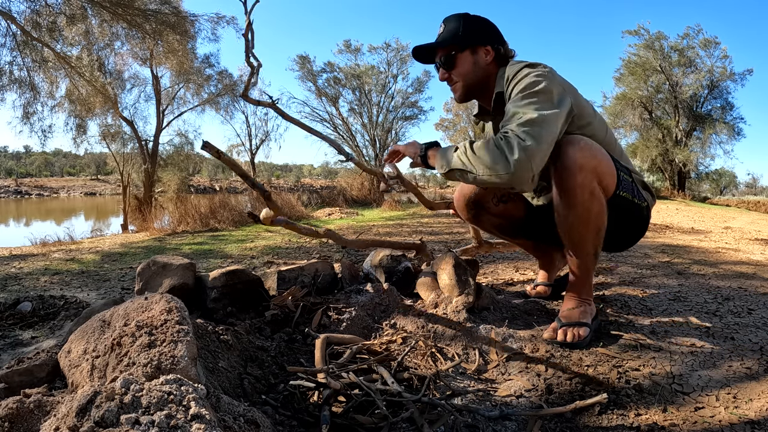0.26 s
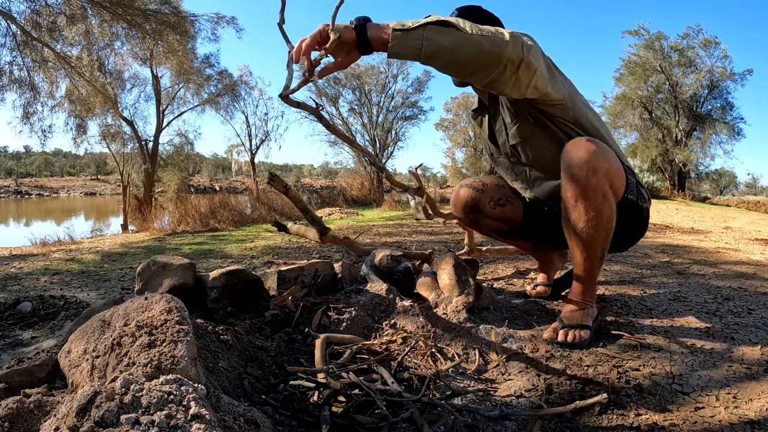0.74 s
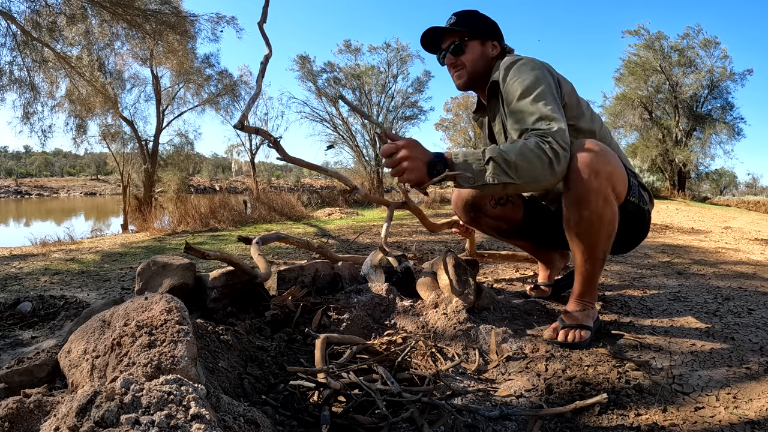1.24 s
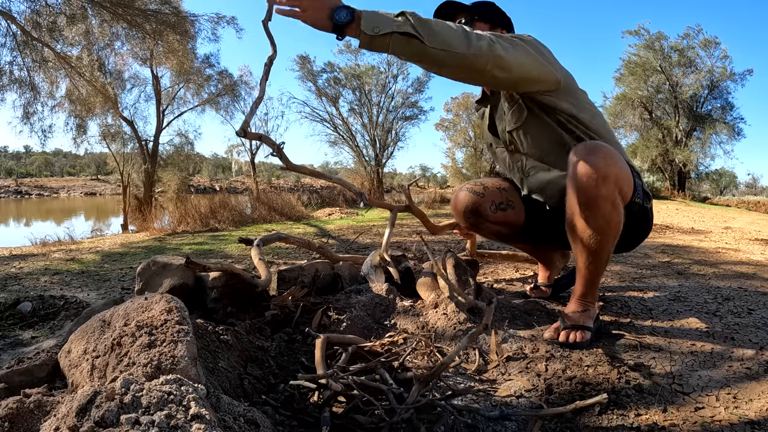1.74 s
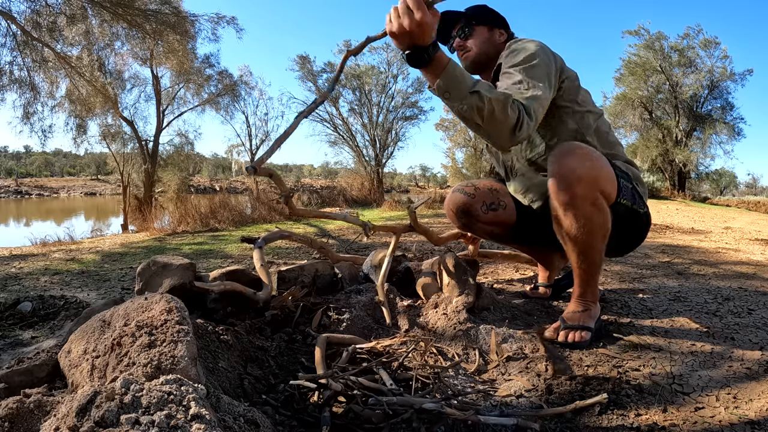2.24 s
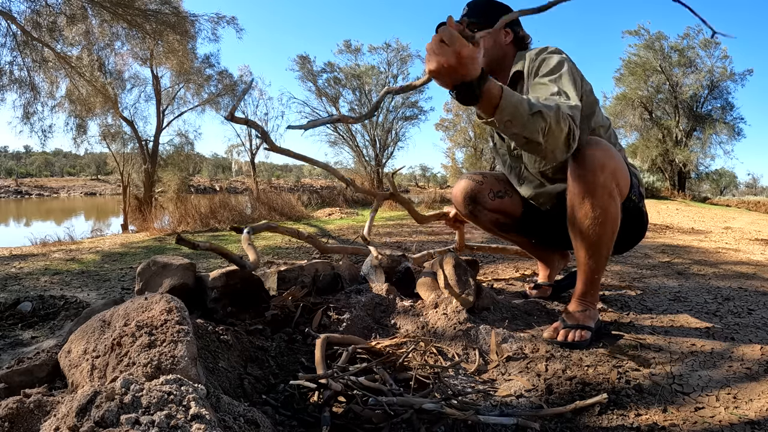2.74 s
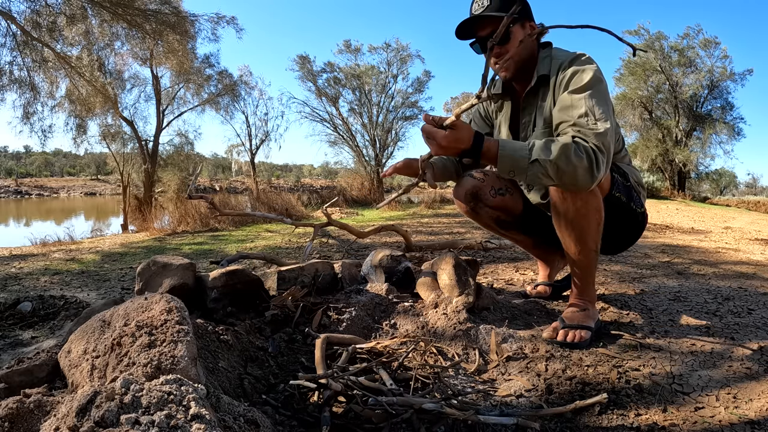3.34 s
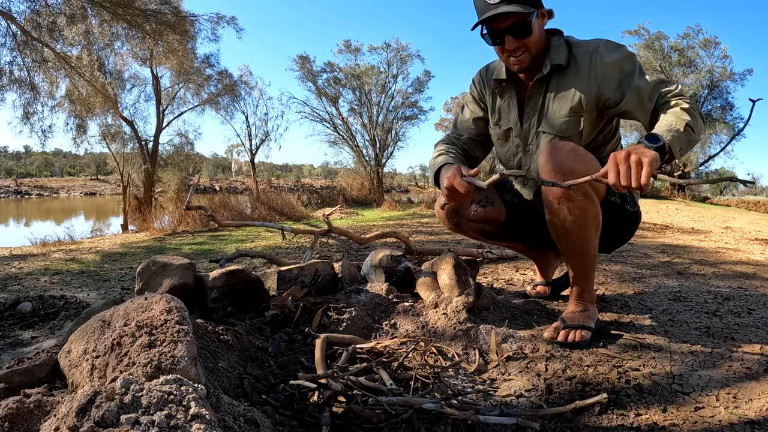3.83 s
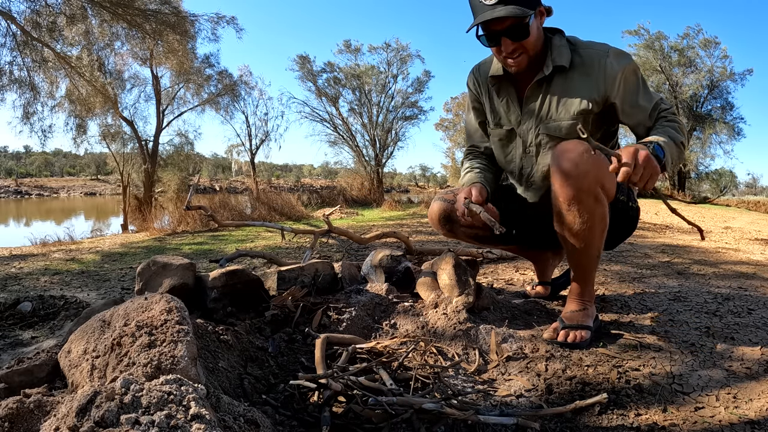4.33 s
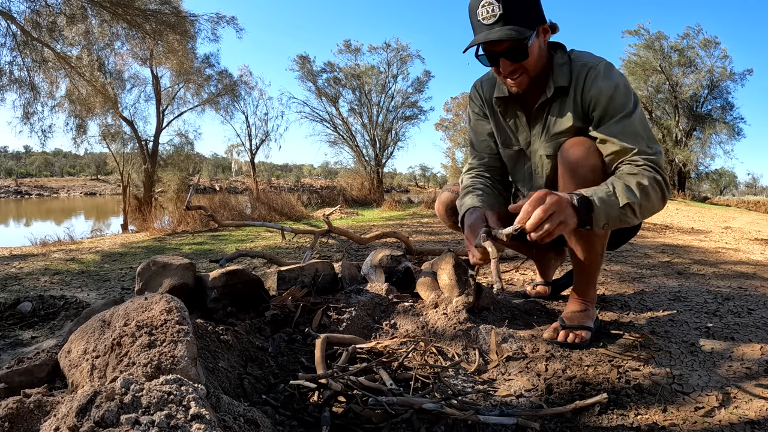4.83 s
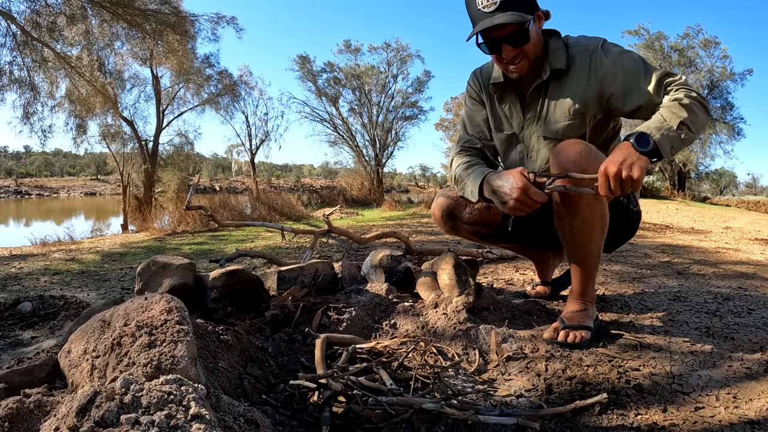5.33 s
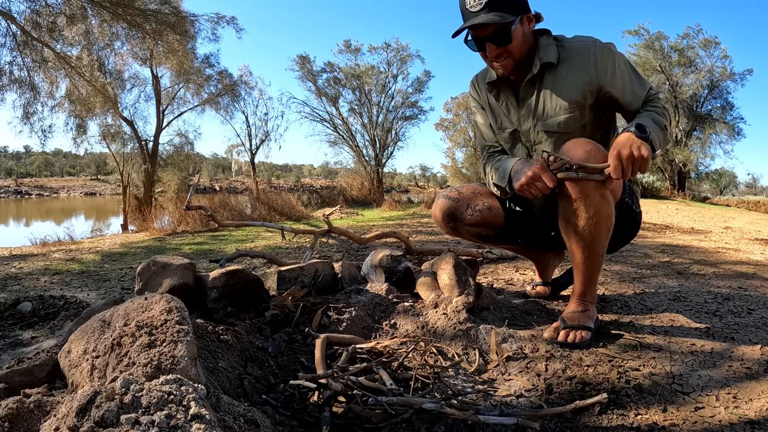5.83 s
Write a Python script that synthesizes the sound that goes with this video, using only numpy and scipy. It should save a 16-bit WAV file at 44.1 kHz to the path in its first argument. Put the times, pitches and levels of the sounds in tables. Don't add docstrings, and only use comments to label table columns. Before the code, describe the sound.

Very close outdoor handling of dry wood. A faint bark rustle and soft thuds over quiet open air, then scraping and a very loud snap just after one second. More ticks and rustles lead to a dense burst of cracks and hollow knocks around two and a half seconds. Handling thins out, with one sharp snap past four seconds, quiet ticks, then a final cluster of bright cracks.

```python
import sys
import numpy as np
from scipy import signal
from scipy.fft import rfft, irfft, next_fast_len
from scipy.io import wavfile
from scipy.ndimage import uniform_filter1d

SR = 44100
rng = np.random.default_rng(int(sys.argv[2]) if len(sys.argv) > 2 else 0)


def how_loud(loudness_db):
    steps = np.asarray(loudness_db, float) / 20
    return 10 ** steps


def int16_out(signal):
    q = np.round(np.clip(np.atleast_2d(signal).T, -1, 1) * 32767)
    wavfile.write(sys.argv[1], SR, q.astype(np.int16))


N = 267819


def evened(x):
    return x / np.sqrt(np.mean(x ** 2) + 1e-20)


def read(points, hz):
    f, value = np.transpose(points)
    return np.interp(np.log(hz + 1), np.log(f + 1), value)


def curves(rows):
    s, *columns = np.transpose(rows)
    return [np.interp(np.arange(N) / SR, s, c) for c in columns]


def add(mix, s, sound):
    part = mix[..., round(s * SR):][..., :sound.shape[-1]]
    part += sound[..., :part.shape[-1]]


def band(x, lo_hz, hi_hz):
    return signal.sosfilt(signal.butter(2, [lo_hz, hi_hz], "bandpass", fs=SR, output="sos"), x)


def ring(x, hz, width_hz):
    r = np.exp(-np.pi * width_hz / SR)
    return signal.lfilter([1, 0, -1], [1, -2 * r * np.cos(2 * np.pi * hz / SR), r * r], x)


def causal(points):
    cepstrum = irfft(np.log(how_loud(read(points, np.fft.rfftfreq(2048, 1 / SR)))))
    cepstrum[1:1024] *= 2
    cepstrum[1025:] = 0
    return irfft(np.exp(rfft(cepstrum)))[:512]


def placed(x, pan_db):
    return x * how_loud(np.array([pan_db / 2, -pan_db / 2]).reshape(2, -1))


def patches(frames, bins, long, wide):
    field = rng.standard_normal((bins, frames))
    field = uniform_filter1d(field, wide, axis=0)
    return evened(uniform_filter1d(field, long, axis=1))


def air():
    # pitch in Hz, level in dB per Hz.
    air_colour = [(35, -40.5), (60, -11), (91, -12), (153, 2), (234, 2), (790, -18.5), (1290, -7),
                  (4070, -20), (5790, -15), (8830, -36.5), (10400, -22), (13100, -39), (14600, -58),
                  (16200, -75)]
    # pitch in Hz, likeness (1 = the same).
    likeness = [(60, 0.32), (240, 0.57), (950, 0.25), (3770, 0.68), (15000, 0.76)]
    # time in seconds, level in dB.
    breeze = [(0, 10.5), (.35, 2.5), (.56, 1), (1.1, 2), (3.5, 9), (4.1, 4), (4.6, 7), (6.07, -0.5)]
    air_db = -70.5
    frames, hz = N // 256 + 5, np.fft.rfftfreq(1024, 1 / SR)
    a, b, c, d = rng.standard_normal((frames, 513, 4)).T
    same = np.clip(read(likeness, hz), -1, 1)[:, None]
    left = a + 1j * b
    right = same * left + np.sqrt(1 - same ** 2) * (c + 1j * d)
    drift_db = 0.88 * patches(frames, 513, 14, 40)
    z = np.array([left, right]) * how_loud(read(air_colour, hz)[:, None] + drift_db)
    hiss = evened(signal.istft(z, nperseg=1024, noverlap=768)[1][:, :N])
    return how_loud(air_db + curves(breeze)[0]) * hiss


def jolted():
    # peak in seconds, bending hum in dB, slow sway in dB, dragging on soil in dB.
    jolts = [(.11, -64, -44, -79), (.28, -51, -53.5, -60.5), (.43, -43.5, -46.5, -85),
             (.65, -40, -36.5, -50.5), (.9, -40.5, -41.5, -62.5), (1.163, -33, -29, -53),
             (1.409, -40, -43, -87), (1.87, -47, -53, -60.5), (2.29, -44, -45.5, -62),
             (2.45, -44, -34, -51.5), (2.609, -32, -43, -48), (2.79, -40, -39, -56.5),
             (3.32, -48.5, -51.5, -51.5), (3.459, -32, -35, -52), (3.73, -45, -37.5, -62.5),
             (4.199, -61, -53, -61.5), (5.86, -67, -53, -60.5), (6.07, -66, -58.5, -52.5)]
    # hum, sway and drag, in dB per second.
    rise = (167, 134, 191.5)
    # hum, sway and drag, in dB per second.
    fall = (70, 62, 66)
    # hum, sway and drag, in dB.
    still_db = (-91, -73, -73)
    t, rows = np.arange(0, N + 256, 256) / SR, np.array(jolts)
    late = (t - rows[:, :1])[:, :, None]
    lost_db = np.where(late < 0, -late * np.array(rise), late * np.array(fall))
    power = (how_loud(rows[:, None, 1:] - lost_db) ** 2).sum(0) + how_loud(np.array(still_db)) ** 2
    return curves(np.column_stack([t, 10 * np.log10(power)]))


def branch():
    hum_hz, sway_hz, bend_top_hz = 73, 34, 100
    hum_db, sway_db, drag_db = jolted()
    a, b, c, d = rng.standard_normal((4, N))
    hum = ring(ring(a, hum_hz, 7.9), hum_hz, 32)
    hum /= np.sqrt(uniform_filter1d(hum ** 2, 9000) + .2 * np.mean(hum ** 2))
    sway = ring(ring(b, sway_hz, 32), sway_hz, 25)
    shake = how_loud(hum_db) * evened(hum) + how_loud(sway_db) * evened(sway)
    shake = signal.sosfilt(signal.butter(4, bend_top_hz, fs=SR, output="sos"), shake)
    shake += how_loud(drag_db + 4) * evened(band(band(c, 97, 228), 140, 430))
    rumble = how_loud(np.maximum(drag_db, sway_db - 12) - 15.0) * evened(band(d, 25, 300))
    return placed(shake, 1.4) + rumble * [[1], [-1]]


def thuds():
    # start in seconds, peak in dB, pitch in Hz, time to fade by 60 dB in seconds.
    landings = [(0.259, -36, 114, 0.23), (0.585, -28, 157, 0.1), (1.071, -31, 109, 0.066),
                (1.814, -39, 230, 0.043), (1.98, -39.5, 113, 0.068), (2.171, -31, 178, 0.031),
                (2.22, -38, 111, 0.089), (2.286, -33.5, 164, 0.18), (2.485, -25, 161, 0.05),
                (2.577, -33.5, 178, 0.13), (2.695, -39, 166, .08), (3.647, -37.5, 155.4, 0.16),
                (3.291, -41.5, 174, 0.076), (3.33, -28, 144, 0.1), (3.424, -22.5, 109.8, 0.12),
                (3.721, -41.5, 115, 0.068), (5.785, -36.5, 231, 0.026)]
    puff_db = -2.5
    out, t = np.zeros(N), np.arange(6000) / SR
    noise = rng.standard_normal((len(landings), len(t)))
    for (s, db, hz, t60), puff in zip(landings, noise):
        fade = how_loud(-60 * t / np.clip(t60, .02, .3))
        dull = evened(band(puff, 130, 350))
        sound = np.sin(2 * np.pi * hz * t) + how_loud(puff_db) * fade ** 0.21 * dull
        sound *= fade * np.minimum(t / 0.002, 1)
        add(out, s - .002, how_loud(db) * sound / abs(sound).max())
    return out


def rubbing():
    # time in seconds, level in dB.
    fidget = [(0, -62.5), (.59, -75.5), (.7, -63.5), (1.15, -48), (1.4, -63.5), (1.75, -57.5), (2.15, -51),
              (2.39, -57.5), (2.5, -45.5), (3.13, -72), (3.34, -58.5), (3.7, -64.5), (3.82, -69),
              (4.37, -67.5), (4.75, -61), (5.57, -69), (5.75, -53.5), (6.07, -62)]
    # pitch in Hz, level in dB per Hz.
    rub_colour = [(530, -31.5), (900, -6.5), (1910, -4), (2130, -8.5), (4390, -6), (7400, -8.5),
                  (8900, -15), (10500, -14), (11600, -17), (13700, -26.5), (15000, -44), (16200, -62)]
    # middle in seconds, level in dB, length in seconds.
    light_strokes = [(0.034, -62, 0.31), (0.287, -54, 0.065), (0.953, -38.5, 0.041), (1.133, -39, 0.023),
                     (1.345, -54, 0.12), (1.428, -51.5, 0.051), (1.832, -47.5, 0.14), (2.126, -46, 0.12),
                     (2.564, -37.5, 0.034), (3.569, -51.5, 0.2), (3.649, -48.5, 0.031),
                     (3.716, -51.5, 0.08), (4.231, -50, 0.049), (4.918, -54.5, 0.074), (5.22, -53, 0.13),
                     (5.306, -47, 0.067), (.36, -70, 0.061), (.62, -64.5, 0.061), (2.741, -53, 0.022),
                     (3.231, -57.5, .07), (3.36, -46, 0.029), (4.285, -63.5, 0.054), (5.62, -65, 0.064),
                     (2.169, -58, .03), (2.61, -49.5, 0.046), (6.07, -39.5, 0.068)]
    # middle in seconds, level in dB, length in seconds, dull scrape in relative dB.
    heavy_strokes = [(0.77, -44.5, 0.12, -9), (1.068, -44, 0.079, -4.5), (1.735, -43, 0.056, -14.5),
                     (2.244, -49.5, 0.084, 0), (2.472, -35.5, 0.026, -9.5), (4.992, -68.5, 0.12, 2.5),
                     (2.652, -54, 0.012, 0), (2.831, -62.5, 0.12, 11.5), (2.918, -50, 0.022, -11),
                     (3.328, -50, 0.083, -16), (3.448, -49, 0.026, -22), (3.903, -57.5, 0.08, -19),
                     (4.181, -41.5, 0.031, -17.5), (4.767, -49, 0.057, -13), (5.464, -60, 0.083, -19),
                     (5.697, -52, 0.015, -11.5), (5.912, -61, 0.25, -4)]
    light_dull_db = -21.5
    t = np.arange(N) / SR
    bright = how_loud(curves(fidget)[0] - 2.0) ** 2
    dull = bright * how_loud(-10.5) ** 2
    for s, db, length, dull_db in heavy_strokes + [(*row, light_dull_db) for row in light_strokes]:
        stroke = how_loud(db - 7.5 * abs(2 * (t - s) / length) ** 2.5) ** 2
        bright = bright + stroke
        dull = dull + stroke * how_loud(dull_db) ** 2
    clumps = evened(uniform_filter1d(uniform_filter1d(rng.standard_normal(N), 200), 200))
    grains = rng.standard_normal((2, N)) * how_loud(2.6 * np.minimum(rng.exponential(1, N), 3))
    grains *= rng.random(N) < 3000 / SR
    drive = (evened(grains) + .9 * rng.standard_normal((2, N))) * how_loud(2.2 * clumps)
    z = signal.stft(drive[0] + 0.24 * drive[1] * [[1], [-1]], nperseg=256)[2]
    z = z * how_loud(3.2 * patches(z.shape[2], z.shape[1], 8, 12))
    drive = signal.istft(z, nperseg=256)[1][:, :N]
    rustle = evened(signal.oaconvolve(drive, causal(rub_colour)[None])[:, :N])
    scrape = evened(band(drive.mean(0), 520, 1300))
    return np.sqrt(bright) * rustle + np.sqrt(dull) * scrape


def knocks(rows):
    out, t = np.zeros(N), np.arange(4000) / SR

    def loss(hz):
        return (hz / 1000) ** .65 / .047

    def mode(blow, hz):
        return evened(ring(blow, hz, 2.2 * loss(hz)) + .4 * ring(blow, 1.06 * hz, 4 * loss(hz)))

    for (s, db, hz, hz2, db2), grit in zip(rows, rng.standard_normal((len(rows), len(t)))):
        blow = band(grit * np.exp(-t / .0025), .6 * min(hz, hz2), 1.3 * max(hz, hz2))
        modes = mode(blow, hz) + how_loud(db2) * mode(blow, hz2) + 0.2 * evened(blow)
        add(out, s, how_loud(db + 1.5) * modes / abs(modes).max())
    return out


def debris():
    # start in seconds, peak in dB, ring in Hz, thick wood in dB,
    # thin fibres in dB, length in seconds.
    rips = [
        (2.4592, -2.5, 5600, -8, -9, .0085),
        (1.1825, -3.5, 4300, -8, -6.5, .0036),
        (4.188, -6, 5600, -11, -6, .0032),
        (5.885, -13, 6000, -14, -7, .004),
    ]
    # start in seconds, peak in dB, ring in Hz.
    crumbs = [(0.0483, -38, 7130), (0.2631, -39, 5600), (0.3506, -40, 5380), (0.3964, -47, 5120),
              (0.5982, -41, 5770), (0.6238, -45.0, 5620), (0.6341, -44, 5430), (0.7331, -27, 5230),
              (0.7529, -26, 6780), (0.7935, -19.5, 5770), (0.9405, -17, 4460), (0.9665, -18, 7000),
              (1.0242, -31, 2000), (1.0651, -32, 7820), (1.0858, -29, 6930), (1.1396, -18, 5900),
              (1.2599, -39.0, 4910), (1.3055, -28, 11000), (1.3238, -29.0, 6980), (1.4405, -37, 4690),
              (1.5093, -44.0, 5300), (1.7167, -24, 6310), (1.7273, -26.0, 5680), (1.8242, -30, 2000),
              (1.8501, -30.0, 6500), (2.0844, -29, 5810), (2.0996, -28, 6740), (2.1558, -29.0, 4010),
              (2.2575, -32.0, 10570), (2.3598, -44.0, 6800), (2.4723, -16, 4650), (2.476, -17, 5490),
              (2.5575, -28.0, 2000), (2.6134, -32.0, 7060), (2.6392, -28.0, 2000), (2.6889, -35.0, 2950),
              (2.722, -34.0, 2760), (2.7927, -39.0, 4480), (2.8243, -36.0, 3620), (3.0098, -28, 5640),
              (3.1853, -39.0, 4970), (3.2507, -40, 2000), (3.31, -27, 6890), (3.3177, -32.0, 3190),
              (3.3635, -33, 5580), (3.4266, -24, 4310), (3.5403, -28, 5660), (3.646, -28, 2650),
              (3.6696, -36.0, 3960), (3.727, -31.5, 5730), (3.7477, -35.0, 4590), (4.1796, -13.5, 3960),
              (4.1971, -28.0, 7730), (5.6897, -35.0, 9710), (5.8283, -31.0, 4610), (5.8775, -23, 3700),
              (5.9021, -30, 6850), (5.9837, -37.0, 6720), (6.0479, -18, 5940)]
    # start in seconds, peak in dB.
    specks = [(0.0954, -46.0), (0.3738, -49), (0.4771, -51), (0.4835, -51), (0.5931, -42), (0.6152, -47),
              (0.6419, -51.0), (0.7072, -43), (0.7147, -37.0), (0.8366, -40.0), (1.0399, -31.0),
              (1.0726, -29.0), (1.099, -30), (1.4028, -41.0), (1.5625, -49.0), (1.5904, -44.0),
              (1.6069, -44.0), (1.635, -43), (1.6726, -46.0), (1.9044, -44.0), (2.2864, -36), (2.7393, -44),
              (2.9504, -39), (2.9652, -40.0), (3.0833, -49.0), (3.1265, -53.0), (3.1969, -46.0),
              (3.2286, -46), (3.4531, -39.0), (3.717, -44), (3.8834, -42.0), (3.9295, -42.0),
              (3.9946, -47.0), (4.0538, -50.0), (4.2079, -33.0), (4.4261, -47.0), (4.5079, -52),
              (4.535, -45), (4.5522, -43.5), (4.5593, -47.0), (4.6258, -47.0), (4.6596, -52),
              (4.684, -45.0), (4.7218, -41.0), (4.844, -48), (4.9335, -42.0), (5.1126, -45.0),
              (5.122, -47.0), (5.1877, -40.0), (5.4334, -47.0), (5.4646, -48.0), (5.5003, -47.0),
              (5.6287, -51.0), (5.6732, -49.0), (5.7119, -37.0), (5.866, -41)]
    thick_db, thin_db, boost_db = -16, -8, .7
    crumb_s, speck_s, speck_hz = .0028, .0025, 5600
    rows = [(s, db + boost_db, hz, thick_db, thin_db, crumb_s) for s, db, hz in crumbs]
    rows += [(s, db + boost_db, speck_hz, thick_db, thin_db, speck_s) for s, db in specks]
    return rips + rows


def breaks():
    # start in seconds, peak in dB, thick wood in dB, thin fibres in dB,
    # length in seconds.
    snaps = [(1.1812, 6, -11.5, -3.5, .0026), (1.9778, -12.5, -16, -3, 0.0037),
             (2.2128, -17, -17, -15, 0.011), (2.2243, -3.5, -13, -11, 0.00032),
             (2.5668, -15.5, -14.5, -7.5, 0.0077), (3.0499, -17, -29.5, -4.5, 0.0084),
             (3.2718, -17.5, -36, -4, 0.0022), (4.1732, -14.5, -24, -1.5, 0.01),
             (4.1868, 2, -6, -2, 0.0023), (5.7552, -1.5, -14, -5, 0.0025), (5.913, -6, -7.5, -3.5, 0.0061),
             (6.056, -8.5, -33, -3.5, 0.0066), (6.0265, -2.5, -11, 4, 0.0013),
             (6.0664, -19.5, -25, -15, 0.0051)]
    splinters = [
        (1.7097, -10.5, -18, -2, 0.0021),
        (2.1317, -14, -5.5, -0.5, 0.0061),
        (2.4568, 5, -16.5, -5.5, 0.0024),
        (5.8833, -13.5, -20, -11, 0.0046),
    ]
    limbs = [
        (2.6275, -5.5, -37, -5.5, 0.0056),
        (5.846, -10, -4, 3.5, 0.0035),
        (6.0362, -4, -17, -8, 0.0031),
    ]
    # start in seconds, peak in dB, ring in Hz,
    # thick wood in dB, length in seconds.
    tears = [(.789, -19.5, 5400, -6.5, 0.012), (0.9065, -28, 6840, -28, 0.025),
             (0.936, -31, 5200, -24, 0.012), (1.0301, -17.5, 7400, -8, 0.0073),
             (1.124, -19.5, 7140, -27, 0.048), (1.7, -21.5, 6450, -12.5, 0.0084),
             (1.795, -17.5, 5870, -17, 0.018), (2.1635, -18.5, 2420, -7, 0.011),
             (2.802, -23.5, 2780, -28, 0.011), (2.849, -28.5, 6700, -10, 0.008),
             (2.911, -29, 2680, -28, 0.016), (2.954, -28, 2270, -4, 0.0084),
             (3.2893, -26.5, 3250, -1.5, 0.02), (3.33, -28, 2410, -7, 0.0068),
             (3.412, -23, 3700, 1.5, 0.0098), (5.159, -28.5, 7760, -11, 0.012),
             (5.209, -23, 6860, -9.5, 0.019), (5.697, -30, 6120, -7, 0.015),
             (5.7455, -25.5, 6000, -20, 0.013), (5.8147, -26.5, 5840, -27, 0.013),
             (5.905, -24, 6130, -30, 0.011), (6.051, -20, 5340, -35, 0.063)]
    # start in seconds, peak in dB, ring in Hz.
    ticks = [(0.584, -28, 6140), (0.674, -34.5, 5960), (1.304, -31, 2570), (1.371, -35, 4060),
             (1.418, -24.5, 2600), (1.581, -35, 10100), (1.873, -31, 7440), (1.8928, -32.5, 5400),
             (2.014, -30.5, 5100), (2.241, -22.5, 5000), (2.293, -23.5, 4460), (2.3204, -21.5, 4440),
             (2.3767, -27.5, 4340), (2.5334, -22, 5530), (2.6763, -27.5, 3450), (2.7005, -28, 2840),
             (2.8731, -33.5, 3240), (3.0023, -30, 4700), (3.497, -33.5, 4150), (3.7385, -35, 2800),
             (3.9152, -26, 2940), (4.2216, -23.5, 2600), (4.7332, -23.5, 10900), (4.973, -38.5, 6450),
             (5.0888, -25, 5000), (5.772, -19.5, 4450), (5.779, -24, 7840), (5.9552, -25, 7840),
             (6.002, -19, 5760)]
    # start in seconds, peak in dB.
    flakes = [(1.316, -27), (1.478, -37), (1.6296, -35.5), (1.6603, -36), (3.999, -39), (4.723, -53),
              (4.7586, -25), (4.8959, -32.5), (5.2901, -22), (5.3322, -30.5), (5.85, -16), (5.933, -17)]
    snap_hz, splinter_hz, limb_hz = 5400, 6900, 3700
    tear_thin_db, tick_thick_db, tick_thin_db = -4, -13, -4.5
    tick_s, flake_s = 0.0058, 0.0039
    rows = []
    for table, hz in ((snaps, snap_hz), (splinters, splinter_hz), (limbs, limb_hz)):
        rows += [(s, db, hz, *rest) for s, db, *rest in table]
    rows += [(*row, tear_thin_db, length) for *row, length in tears]
    rows += [(*row, tick_thick_db, tick_thin_db, tick_s) for row in ticks]
    rows += [(*row, splinter_hz, tick_thick_db, tick_thin_db, flake_s) for row in flakes]
    return rows


def cracks(rows, size=2500):
    # pitch in Hz, level in dB per Hz.
    crack_colour = [(290, -20.5), (500, -31.5), (720, -40.5), (1150, -11.5), (5530, -3.5), (8430, -4),
                    (9200, -4), (10000, 1), (11300, -8.5), (13000, -16.5), (16200, -37.5)]
    out, t, colour = np.zeros(N), np.arange(size) / SR, causal(crack_colour)
    fibres, chance = rng.standard_normal((len(rows), 2, len(t))), rng.random((len(rows), 3))
    for (s, db, hz, thick_db, thin_db, length), (a, b), pick in zip(rows, fibres, chance):
        tear = how_loud(-14 * (t / np.clip(length, .001, .03)) ** 1.17) + how_loud(-34.0 - 60 * t / 0.039)
        first = 1 + .5 * np.exp(-t / 0.0029)
        onset = np.minimum(t / (0.13 * length), 1)
        clicks = a * how_loud(3.9 * b) * tear * first * onset
        drive = signal.fftconvolve(clicks, colour)[:len(t)]
        body = evened(band(drive, 2200, 8700)) + 0.91 * evened(ring(drive, hz, 0.31 * hz))
        thick_modes = sum(ring(drive, f, 260) for f in 900 + 1300 * pick)
        thick = evened(band(drive, 800, 3500)) + evened(thick_modes)
        thin = evened(band(drive, 8000, 20000))
        sound = evened(body) + how_loud(thick_db) * evened(thick) + how_loud(thin_db) * thin
        add(out, s, how_loud(db - 3.5) * sound / abs(sound).max())
    return out


def ground(x):
    # delay in seconds, level in dB.
    bounces = [
        (.0016, -31.5),
        (.0031, -20.5),
        (.0058, -25.5),
        (0.013, -37.5),
    ]
    out = x.copy()
    for s, db in bounces:
        add(out[0], s, how_loud(db) * x[0])
        add(out[1], s + .00004, how_loud(db) * x[1])
    return out


def ports(x):
    # pitch in Hz, difference in dB.
    port_balance = [(40, -4.5), (240, -3), (950, -2), (4000, -.6), (9000, 1), (14000, 6.5)]
    # pitch in Hz, lead in radians.
    port_lead = [(60, -.3), (500, -.25), (3100, -.7), (7500, -.6), (10000, -.3), (12500, .5)]
    size = next_fast_len(N)
    hz = np.fft.rfftfreq(size, 1 / SR)
    half = how_loud(read(port_balance, hz) / 2) * np.exp(.5j * read(port_lead, hz))
    glance = np.zeros(N)
    add(glance, .0007, band(x.mean(0), 11200, 17000))
    heard = x + how_loud(-5.5) * glance * [[1], [-1]]
    return irfft(rfft(heard, size) * np.array([half, 1 / half]), size)[:, :N]


def scene():
    # start in seconds, peak in dB, first mode in Hz,
    # second mode in Hz, second mode in dB.
    thick_sticks = [(1.044, -33, 980, 1640, 0), (1.072, -36.5, 623, 960, -8), (2.567, -26, 2570, 5400, -21),
                    (2.627, -12, 1810, 1070, -8), (2.627, -18, 2120, 1226, 2),
                    (2.795, -40.5, 744, 1520, -10), (2.824, -44.5, 980, 716, -1),
                    (2.957, -28, 1240, 2230, 1), (3.053, -29.5, 1740, 544, -19),
                    (3.271, -38.5, 730, 333, 1.5), (3.427, -32, 393, 806, -18),
                    (4.7324, -41, 1184, 870, -15), (4.744, -31, 1230, 2330, -6),
                    (4.789, -42, 1170, 4200, -7), (1.533, -44.5, 2250, 1250, -2.5),
                    (5.787, -44.5, 437, 810, -2)]
    more_knocks = [(2.458, -24, 900, 620, -2), (1.182, -28, 520, 340, 0), (.048, -46, 1690, 2410, -14),
                   (2.628, -25, 1590, 426, -8), (2.636, -27.5, 2450, 860, -3), (2.803, -39, 1390, 1670, 0),
                   (2.826, -47, 2430, 1745, -6), (4.936, -47, 1800, 1150, 0), (5.428, -47, 1200, 2200, 0),
                   (5.331, -46, 1410, 2400, -8)]
    # time in seconds, left over right in dB.
    hands = [
        (0, -1),
        (1, 0.5),
        (3.6, -0.5),
        (4, -2.5),
        (6.07, -3),
    ]
    far, low = air(), branch() + thuds()
    wood = rubbing() + knocks(thick_sticks) + knocks(more_knocks)
    wood = wood + cracks(debris(), size=1200) + cracks(breaks())
    return ports(ground(placed(wood, curves(hands)[0])) + low) + far


def top_cut(x):
    return signal.sosfilt(signal.butter(12, 16380, fs=SR, output="sos"), x)


def record(dry):
    excess = np.maximum(abs(dry).mean(0) - .2, 0) ** 2
    push = signal.lfilter(*signal.butter(2, 95, fs=SR), excess)
    push = signal.lfilter(*signal.butter(1, 9, "highpass", fs=SR), push)
    x = np.tanh(dry / 1.366) * 1.31 - 5.7 * placed(push, -7.5)
    x = signal.sosfilt(signal.butter(4, 14800, fs=SR, output="sos"), x)
    x = signal.sosfilt(signal.butter(12, 16600, fs=SR, output="sos"), x)
    return top_cut(x)


dry = scene()
out = record(dry)
int16_out(out)
```